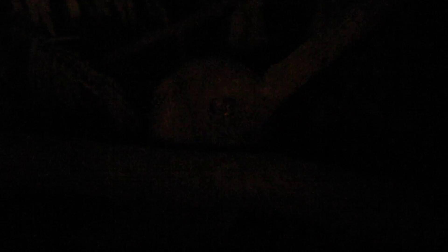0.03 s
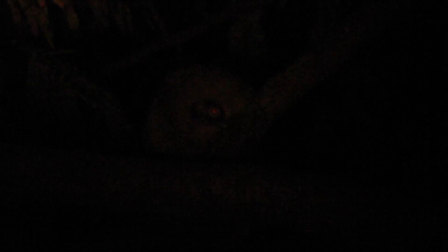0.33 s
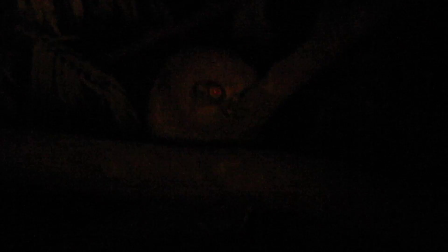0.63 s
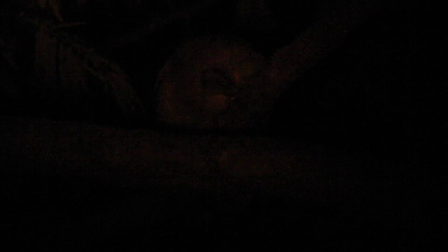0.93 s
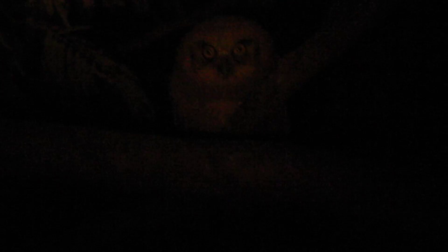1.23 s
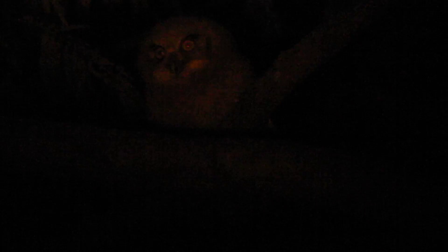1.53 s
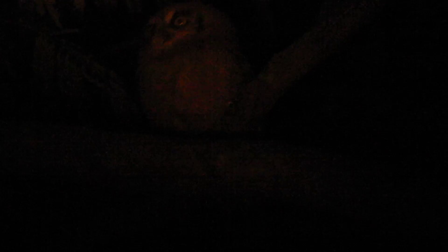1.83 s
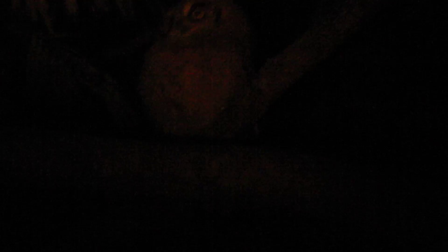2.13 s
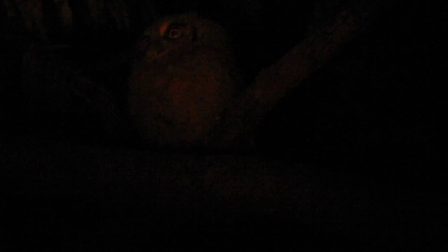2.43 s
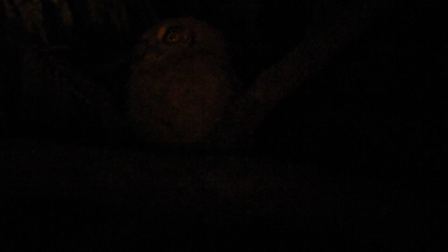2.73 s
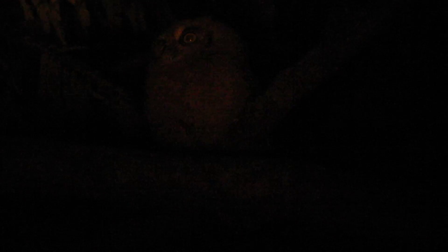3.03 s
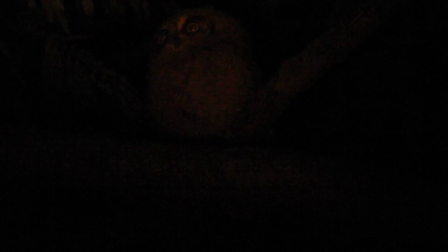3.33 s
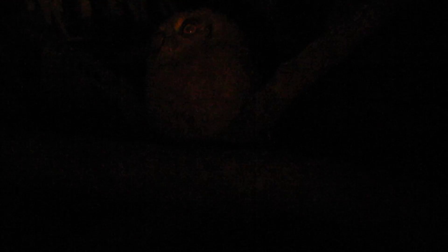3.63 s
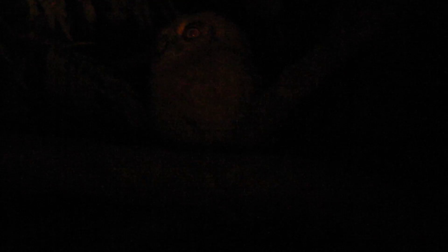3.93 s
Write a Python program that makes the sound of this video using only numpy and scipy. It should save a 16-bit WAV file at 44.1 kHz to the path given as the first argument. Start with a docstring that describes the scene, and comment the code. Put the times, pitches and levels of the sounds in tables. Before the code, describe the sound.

Frogs whoop in short rising whistles over buzzing insects in a night forest.

```python
"""Frogs whoop in short rising whistles in a forest at night, a few near, a crowd far off among the trees.
An insect's wing strokes buzz steadily and bush crickets sizzle high above a low, even rush of air
and a faint drone. A hoarse chirp keeps a quick beat, a far peep a slow one.
Three times a soft, hissy rustle swells and fades."""
import sys
import numpy as np
from scipy import signal
from scipy.fft import rfft, irfft, next_fast_len
from scipy.io import wavfile
from scipy.ndimage import map_coordinates

SR = 44100
rng = np.random.default_rng(int(sys.argv[2]) if len(sys.argv) > 2 else 0)


def log_audio(samples):
    """Write samples as a 16-bit WAV file to the path given in sys.argv[1]."""
    # one column per channel
    frames = np.atleast_2d(samples).T
    # limit to full scale, then quantise
    limited = np.clip(frames, -1, 1)
    pcm = np.round(limited * 32767).astype(np.int16)
    wavfile.write(sys.argv[1], SR, pcm)


N = 176400


def amp(db):
    """Decibels to gain."""
    return 10 ** (np.asarray(db) / 20)


def unit(x):
    """Scale to rms 1."""
    return x / np.sqrt(np.mean(x ** 2) + 1e-20)


def along(points, hz):
    """Interpolate (freq_hz, value) points on a log frequency axis."""
    knots_hz, values = np.transpose(points)
    return np.interp(np.log(hz + 1), np.log(knots_hz + 1), values)


def wobble(knots_per_s, size=N):
    """Smooth random curve."""
    knots = rng.standard_normal(int(size * knots_per_s / SR) + 4)
    return map_coordinates(knots, [np.arange(size) * knots_per_s / SR])


def filtered(x, response):
    """Apply the gain curve response(hz)."""
    size = next_fast_len(N + 8192)
    return irfft(rfft(x, size) * response(np.fft.rfftfreq(size, 1 / SR)), size)[..., :N]


def panned(pan_db):
    """Stereo gains; pan_db is left minus right."""
    return amp(np.array([[pan_db], [-pan_db]]) / 2)


def rush(spectrum, correlation):
    """Stereo noise, rms 1; left-right correlation is a number or (freq_hz, value) points."""
    def mid_side_gains(hz):
        alike = along(correlation, hz) if np.ndim(correlation) else np.full_like(hz, correlation)
        angle_rad = np.arccos(np.clip(alike, -1, 1)) / 2
        return amp(along(spectrum, hz)) * [np.cos(angle_rad), np.sin(angle_rad)]
    mid, side = filtered(rng.standard_normal((2, N)), mid_side_gains)
    return unit(np.array([mid + side, mid - side]))


def tone(hz, lead_rad):
    """Stereo sine on a pitch curve, rms 1, left ahead by lead_rad."""
    phase_rad = 2 * np.pi * np.cumsum(hz) / SR
    return np.sqrt(2) * np.sin(phase_rad + np.array([[lead_rad], [-lead_rad]]) / 2)


def add(out, start_s, x):
    """Mix x into out at start_s."""
    offset = round(start_s * SR)
    first, end = max(offset, 0), min(offset + x.shape[1], N)
    if end > first:
        out[:, first:end] += x[:, first - offset:end - offset]


def whoop(length_s, top_hz, lead_rad, start_ratio=.52, crest=.93, edge_s=.004, flutter_db=.36):
    """A frog's pure whistle climbs, levels off and stops; paths through the leaves make it flutter."""
    swell = [(0, -12), (.12, -5.5), (.29, -2), (.47, -3.5), (.65, 0), (.84, -1.5), (1, -5)]  # call_fraction, level_db
    size = int(length_s * SR)
    progress = np.arange(size) / size
    pitch_hz = top_hz * (1 - (1 - start_ratio) * np.abs(1 - progress / crest) ** 1.7)
    edges = np.clip(np.minimum(progress, 1 - progress) * length_s / edge_s, 0, 1)
    flutter = lambda knots_per_s: wobble(knots_per_s, SR // 4)[:size]
    leaf_paths = .23 * np.array([flutter(80.5) + 1j * flutter(80.5) for _ in range(2)])
    whistle = (signal.hilbert(tone(pitch_hz, lead_rad)) * (1 + leaf_paths)).real
    level_db = np.interp(progress, *np.transpose(swell)) + flutter_db * flutter(113.5)
    return whistle * edges * amp(level_db)


def forest(x):
    """Scattered echoes from the trees; treble dies first."""
    decay = [(500, .5), (2500, 0.38), (8000, 0.21)]  # freq_hz, t60_s
    hz, t, noise = signal.stft(rng.standard_normal((2, SR // 2)), SR, nperseg=256)
    fade = amp(-60 * t / along(decay, hz)[:, None])
    tail = signal.istft(noise * fade, SR, nperseg=256)[1]
    tail = tail + .5 * tail[::-1]  # left-right crossfeed
    return signal.fftconvolve(x.mean(0)[None], tail / np.linalg.norm(tail[0]), axes=1)[:, :N]


def frogs(crowd_per_s=24):
    """Near callers, a random crowd deeper in the echoes and the blur of the farthest."""
    near_calls = [(-.03, .128, 2912, -35, 1), (-.002, .138, 2880, -33, 1), (0.12, .126, 2892, -38.5, 1.1),
                  (0.176, .136, 2874, -37.5, 1), (0.239, .146, 2871, -37, 1.3), (.426, .13, 2860, -34.5, 1),
                  (.457, .14, 2874, -29, .4), (0.742, 0.1363, 2916, -40, 1), (0.768, .134, 2889, -30, 1.3),
                  (.942, .136, 2858, -30, 0.89), (1.232, .14, 2825, -28.5, 0.33),
                  (1.493, .133, 2893, -31, 1.5), (1.534, .142, 2867, -34.5, 0.56),
                  (1.646, .124, 2860, -40, .5), (1.761, .134, 2836, -37, .5), (1.893, .132, 2783, -29, .15),
                  (2.081, .14, 2881, -36.5, .8), (2.334, .14, 2870, -30.5, 1.2),
                  (2.365, .13, 2900, -35.5, .6), (2.6, .146, 2854, -27.5, 0.27),
                  (2.764, .138, 2835, -37, 1.3), (2.963, .146, 2874, -35.5, 0.81),
                  (3.129, .122, 2857, -38.5, 1), (3.219, .134, 2850, -28, .25),
                  (3.366, .14, 2880, -30, 1.3), (3.654, .146, 2876, -33.5, 1),
                  (3.896, .132, 2801, -28.5, .3), (3.939, .13, 2900, -32, .5)]  # start_s, length_s, top_hz, level_db, left_lead_rad
    blur_band = [(1200, -24), (1600, -4.5), (2000, 1), (2500, 4.5), (2780, 0.5), (2900, -10), (3020, -36),
                 (3500, -60)]  # freq_hz, relative_db
    near, crowd = np.zeros((2, N)), np.zeros((2, N))
    for start_s, length_s, top_hz, level_db, lead_rad in near_calls:
        add(near, start_s, amp(level_db) * whoop(length_s, top_hz, lead_rad))
    near += amp(-9.5) * forest(near)
    blur = amp(-37.5) * rush(blur_band, correlation=.13)
    _, length_s, top_hz, _, lead_rad = np.mean(near_calls, axis=0)  # crowd varies about the mean call
    count = int(crowd_per_s * N / SR)
    for k, (late, long, high, loud, turn) in enumerate(rng.standard_normal((count, 5))):
        call = whoop(length_s * (1 + .06 * long), top_hz * (1 + .0118 * high), lead_rad + turn)
        add(crowd, (k + late) / crowd_per_s - length_s / 2, amp(-43 + 2.5 * loud) * call)
    return (near + blur + .57 * crowd + .5 * forest(crowd)) * panned(-3.5)


def air(level_db=-31.5):
    """Low, even rush of night air, wider in the treble."""
    spectrum = [(15, -18), (30, -13.5), (42, -8.5), (58, -6.5), (72, -10), (105, -14), (180, -10),
                (350, -9.5), (600, -12), (1000, -14), (1500, -15.5), (2500, -15), (3100, -17), (4200, -22),
                (5200, -24), (5800, -27.5), (8000, -32), (9200, -31), (10000, -32.5), (13000, -28.5),
                (14200, -49), (15600, -52)]  # freq_hz, relative_db
    stereo_likeness = [(100, .98), (500, 0.98), (1000, 0.88), (1700, 0.89), (3000, -0.059), (5000, .25),
                       (7000, -.35), (9000, -0.029), (14000, -0.19)]  # freq_hz, correlation
    return amp(level_db) * rush(spectrum, stereo_likeness)


def hum(waver_db=3.5, drift=.04):
    """Faint, deep drone wavering in pitch and level."""
    partials = [(29.5, -45), (58.5, -48.5)]  # pitch_hz, level_db
    return sum(amp(db + waver_db * wobble(7)) * tone(hz * (1 + drift * wobble(6)), lead_rad=0)
               for hz, db in partials)


def buzzer(wing_tone_hz=6892, strokes_per_s=164, waver_db=3.0):
    """Fast wing strokes split one insect's tone into a comb of lines; more of its kind blur behind."""
    comb_lines = [-6, 3, 4.5, -6, 2.5, -7, -12]  # relative_db
    far_band = [(5400, -25), (6200, -0.5), (6800, -1), (7300, -3.5), (7700, -18), (8600, -31)]  # freq_hz, relative_db
    speed = 1 + .0012 * wobble(4) + .001 * wobble(60)
    comb = np.zeros((2, N))
    for k, db in enumerate(comb_lines, start=-2):
        line_hz = (wing_tone_hz + k * strokes_per_s) * speed
        comb += amp(db + waver_db * wobble(14)) * tone(line_hz, lead_rad=2.39)
    far = amp(-43) * rush(far_band, correlation=-.75)
    return (amp(-45.5) * unit(comb) + far) * panned(.94)


def sizzlers(roughness=2, echo_gain=1.5):
    """Bush crickets: rapid, nearly regular wing strokes ring a very high resonance."""
    crickets = [(11680, 480, 104, -57.5), (12650, 400, 122, -58), (13550, 300, 115, -62)]  # resonance_hz, half_width_hz, strokes_per_s, level_db
    out = np.zeros((2, N))
    for hz, half_width_hz, strokes_per_s, level_db in crickets:
        cycle = np.cumsum(strokes_per_s * (1 + .002 * wobble(8))) / SR % 1
        scrape = np.sin(2 * np.pi * hz * cycle / strokes_per_s) + roughness * rng.standard_normal((2, N))
        strokes = np.exp(-cycle * 12) * scrape
        ring = unit(filtered(strokes, lambda f: 1 / (1 + ((f - hz) / half_width_hz) ** 2)))
        out += amp(level_db) * unit(ring + echo_gain * forest(ring))
    return out * panned(-1.2)


def rustle(grain_db=.92):
    """Soft, fine-grained hiss in three swells; the first and last end duller."""
    bright_swells = [(0, -47), (.12, -43.5), (.24, -40.5), (.33, -35), (.44, -40), (.62, -55), (1.3, -47),
                     (1.45, -41), (1.56, -38), (1.61, -33), (1.75, -36), (1.84, -49), (2.47, -69),
                     (2.55, -40), (2.65, -41), (2.85, -34), (2.94, -44.5), (3.2, -62)]  # time_s, level_db
    bright_band = [(2000, -8.5), (3200, -3.5), (4300, -0.5), (5400, 1), (6500, 0), (8000, -3.5), (9300, -7),
                   (10300, -10), (13000, -34)]  # freq_hz, relative_db
    bright_likeness = [(3000, .87), (5500, .72), (7000, .27), (9000, .05)]  # freq_hz, correlation
    dull_swells = [(0, -48), (.3, -46), (.43, -38), (.6, -55), (2.5, -62), (2.75, -45), (2.92, -40.5),
                   (3.1, -47), (3.35, -64)]  # time_s, level_db
    dull_band = [(2600, -20), (3100, -4), (3600, 1), (4300, -2), (5300, -18), (6500, -31)]  # freq_hz, relative_db
    t = np.arange(N) / SR
    envelope = lambda swells: amp(np.interp(t, *np.transpose(swells)) + grain_db * wobble(150))
    bright = rush(bright_band, bright_likeness) * envelope(bright_swells)
    dull = envelope(dull_swells) * rush(dull_band, correlation=.61)
    return bright + dull


def chirper(first_s=.11, period_s=.154, haste_s=.00029, sigma_s=.022):
    """A distant frog or cricket repeats a hoarse chirp; the beat quickens slightly."""
    chirp_band = [(2900, -62), (3250, 0), (3480, 5), (3850, 2), (4150, -11), (4800, -41)]  # freq_hz, relative_db
    t, k = np.arange(N) / SR, np.arange(28)
    peaks_s = first_s + period_s * k - haste_s * k ** 2
    beat = sum(amp(rng.normal(0, 1)) * np.exp(-.5 * ((t - s) / sigma_s) ** 2) for s in peaks_s)
    return amp(-38.5) * beat * rush(chirp_band, correlation=-.064) * panned(2.2)


def peeper(first_s=.592, period_s=.634, sigma_s=.015):
    """A far caller gives a short, blurred high note at a slow, even pace."""
    peep_band = [(3900, -26), (4200, -3), (4400, 0), (4570, -11), (4900, -33)]  # freq_hz, relative_db
    t = np.arange(N) / SR
    peaks_s = first_s + period_s * np.arange(6)
    beat = sum(np.exp(-.5 * ((t - s) / sigma_s) ** 2) for s in peaks_s)
    return amp(-44) * beat * rush(peep_band, correlation=.4)


def scene():
    """All voices over the night air."""
    return air() + hum() + rustle() + chirper() + peeper() + buzzer() + sizzlers() + frogs()


def record(dry):
    """Brick-wall low-pass."""
    cutoff_hz = 15650
    return filtered(dry, lambda hz: hz < cutoff_hz)


dry = scene()
out = record(dry)
log_audio(out)
```